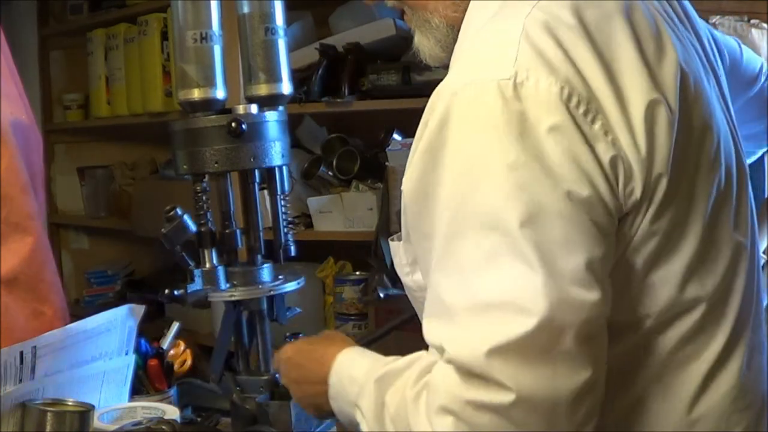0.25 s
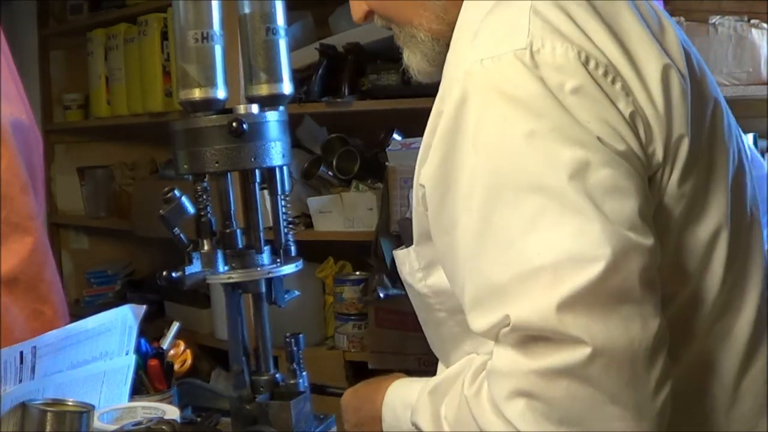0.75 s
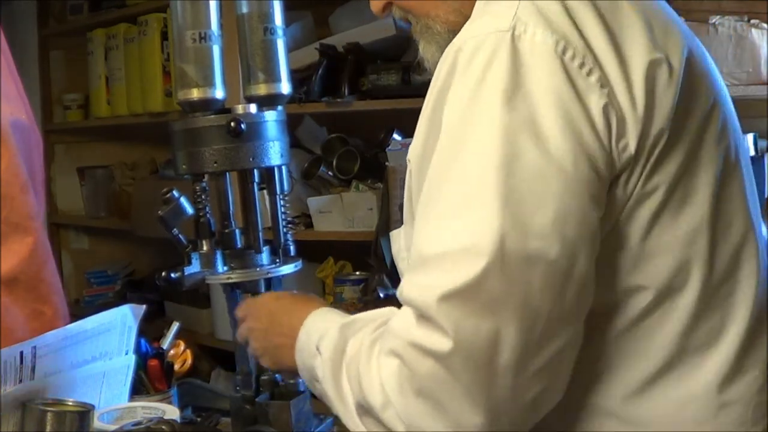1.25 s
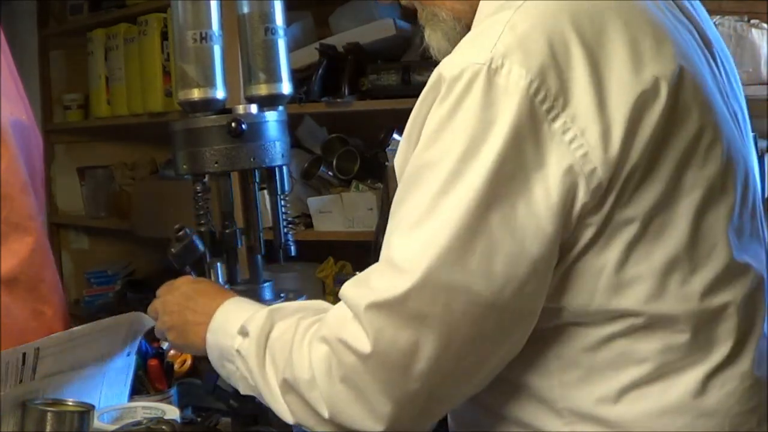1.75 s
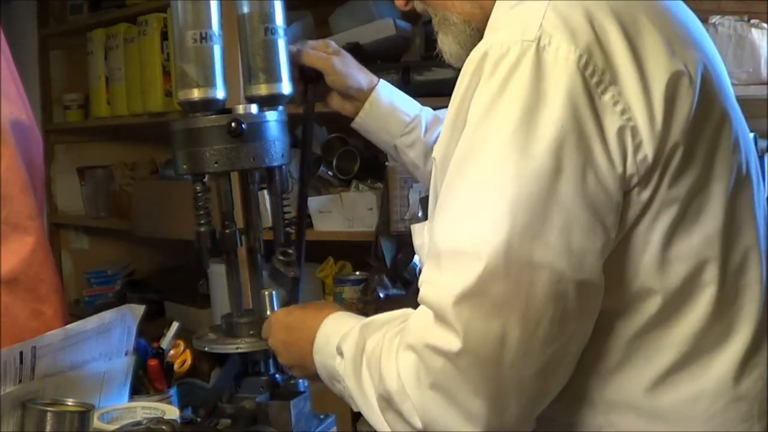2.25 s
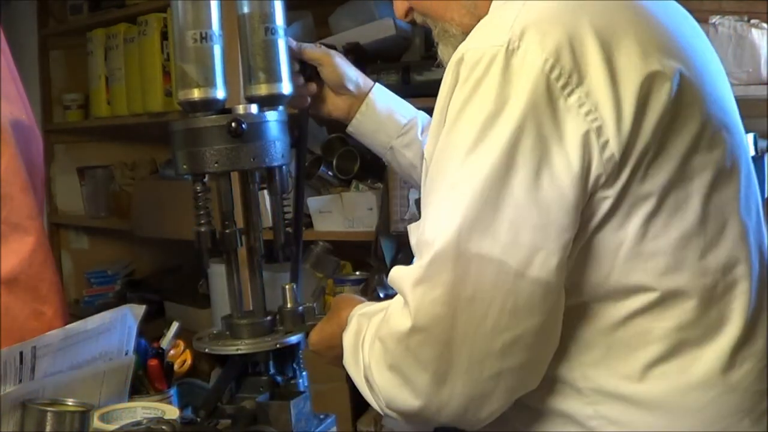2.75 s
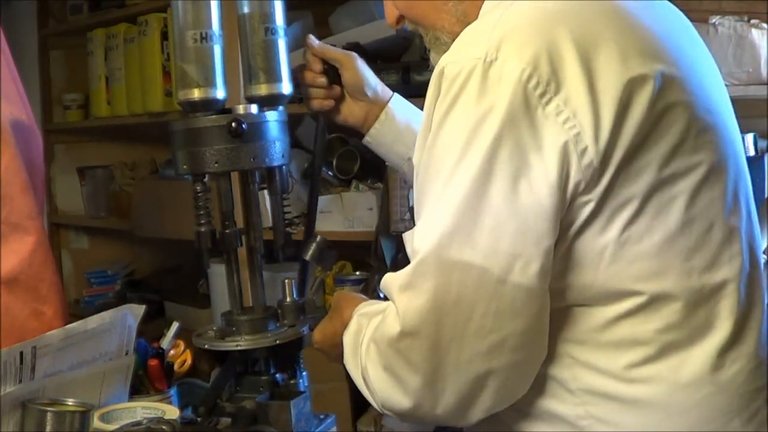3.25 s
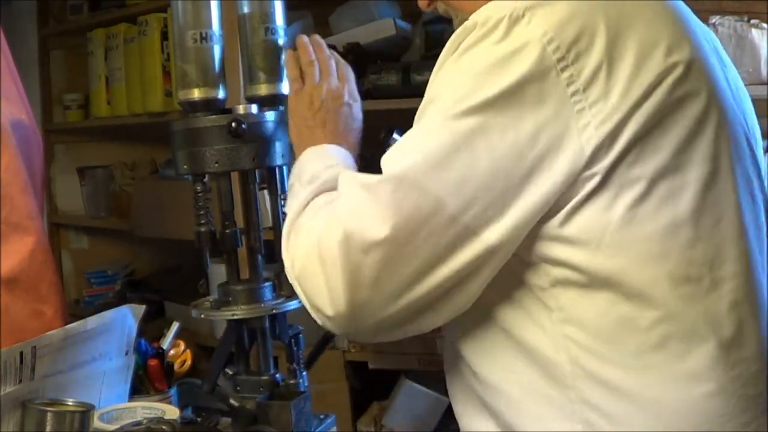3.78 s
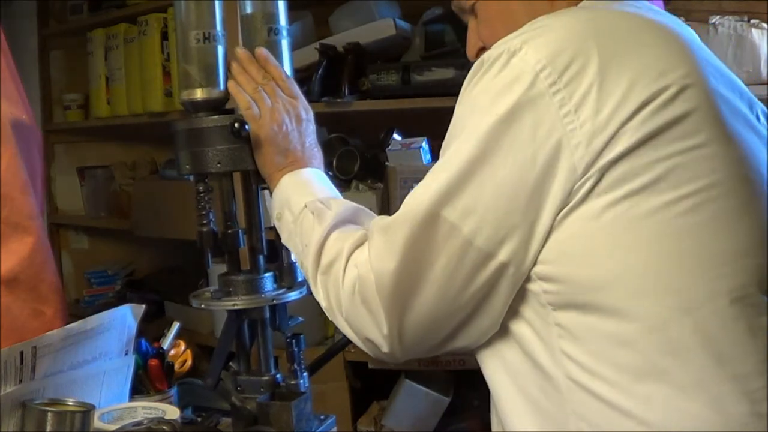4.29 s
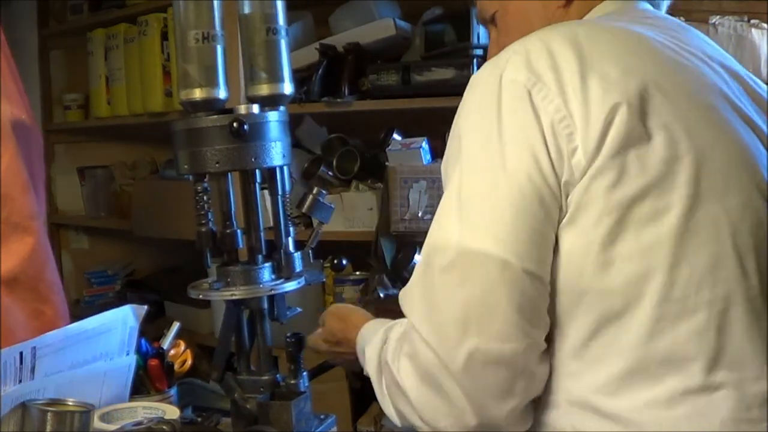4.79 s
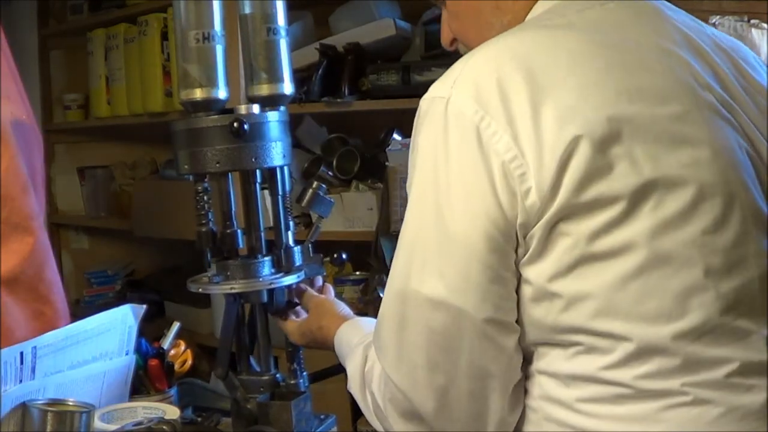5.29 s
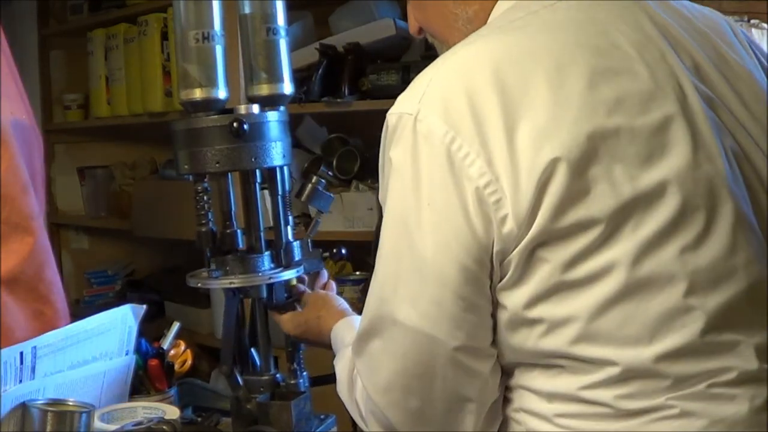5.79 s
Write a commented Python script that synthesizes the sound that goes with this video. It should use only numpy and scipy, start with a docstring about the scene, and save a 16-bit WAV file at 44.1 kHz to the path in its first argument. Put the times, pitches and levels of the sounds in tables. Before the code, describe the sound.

Hand-worked metal press in a small workshop: two piercing high squeals, then clusters of clacks, knocks and sharp clicks, short squeaks, scrapes and sleeve rustle.

```python
"""Shotshell reloading press on a wooden bench.

A hand-worked press in a small, cluttered workshop: dry pivots squeal near 10 kHz as wobbling sines.
Ram, shell plate and linkage clack as noise cracks with ringing modes; a coil spring sings in mode clusters.
Shaped noise gives steel scrapes, sleeve rustle, a low bump and the quiet room; a sine gives a thin whine."""
import sys
import numpy as np
from scipy import signal
from scipy.fft import rfft, irfft, next_fast_len
from scipy.io import wavfile
from scipy.ndimage import uniform_filter1d, minimum_filter1d

SR = 44100
rng = np.random.default_rng(int(sys.argv[2]) if len(sys.argv) > 2 else 0)


def dump(signal):
    """Clip the signal to [-1, 1] and save it as 16-bit WAV at the path in sys.argv[1]."""
    limited = np.clip(np.atleast_2d(signal).T, -1, 1)
    pcm = np.round(limited * 32767).astype(np.int16)
    wavfile.write(sys.argv[1], SR, pcm)


N = 265923
TIME = np.arange(N) / SR
RING_TIME = TIME[:SR // 4]
TOP_HZ = 15900


def undb(db):
    """Decibels to gain."""
    return 10 ** (np.asarray(db) / 20)


def curve(rows, column=1):
    """One column of a table, joined by straight lines in time."""
    rows = np.array(rows)
    return np.interp(TIME, rows[:, 0], rows[:, column])


def unit(x):
    """Scale to an energy of one."""
    return x / np.sqrt(np.sum(x ** 2))


def fade(t, t60_s):
    """Exponential decay, 60 dB in t60_s."""
    return np.exp(-np.log(1000) * t / t60_s)


def envelope(start_s, hold_s, attack_s, release_s):
    """Rise by 60 dB up to the start, hold, and fall by 60 dB per release time."""
    before = (start_s - TIME) / attack_s
    after = (TIME - start_s - hold_s) / release_s
    return fade(np.clip(np.maximum(before, after), 0, 2), 1)


def swells(rows, attack_s, release_s):
    """Sum of the envelopes of (start s, hold s, level dB) rows."""
    return sum(undb(db) * envelope(start, hold, attack_s, release_s) for start, hold, db in rows)


def band(x, low_hz, high_hz):
    """Causal band-pass."""
    sos = signal.butter(3, [low_hz, min(high_hz, .45 * SR)], "band", fs=SR, output="sos")
    return signal.sosfilt(sos, x)


def walk(rate_hz):
    """Smooth random signal with a spread near one."""
    step = max(int(SR / rate_hz), 1)
    held = np.repeat(rng.standard_normal(N // step + 1), step)
    return np.sqrt(1.5) * uniform_filter1d(held, step)[:N]


def shape(x, points):
    """Filter x by a response of (Hz, dB) points, joined over log frequency."""
    hz, db = np.transpose(points)
    size = next_fast_len(N)
    bins_hz = np.maximum(np.arange(size // 2 + 1) * SR / size, 1)
    gain = undb(np.interp(np.log(bins_hz), np.log(hz), db))
    return irfft(rfft(x, size) * gain, size)[:N]


def colour(x, points):
    """Give x a spectrum, at rms one."""
    y = shape(x, points)
    return y / y.std()


def stereo(mid, side):
    """Left and right from mid and side."""
    return np.array([mid + side, mid - side])


def add(track, start_s, sound):
    """Mix a sound into the track."""
    i = max(int(start_s * SR), 0)
    track[i:i + len(sound)] += sound[:N - i]


# Room noise spectrum. Each row: frequency in Hz, relative level in dB.
ROOM_COLOUR = [(10, -50), (30, -18), (70, -7.5), (170, -3.5), (260, -3), (420, -0.5), (700, -5),
               (2000, -7.5), (3500, -7.5), (15000, -10.5)]
# Room noise width. Each row: frequency in Hz, side minus mid in dB.
ROOM_WIDTH = [(60, -16.5), (110, -14.5), (200, -3.5), (380, 0), (700, 6.5), (1290, 7.5), (2380, 3.5),
              (4400, -1.5), (8120, -1.5), (15000, -45)]
ROOM_DB = -48.5
WHINE_HZ, WHINE_DB = 15734, -54.5


def background():
    """Steady room noise, widest in the middle of the range, and a thin electrical whine."""
    mid, side = (colour(rng.standard_normal(N), ROOM_COLOUR) for _ in range(2))
    air = stereo(mid, shape(side, ROOM_WIDTH)) * undb(ROOM_DB)
    whine = np.sqrt(2) * np.sin(2 * np.pi * WHINE_HZ * TIME)
    return air + undb(WHINE_DB) * whine


# Cloth brushing as the arm moves. Each row: time in seconds, level in dB.
ARM_MOTION = [(0, -53), (.26, -41.5), (.5, -47.5), (.88, -53), (1.3, -46.5), (2.65, -46.5), (3.05, -50),
              (3.2, -55), (3.4, -54.5), (3.52, -47.5), (3.75, -39), (4.05, -45.5), (4.3, -43), (4.48, -48),
              (4.68, -36.5), (5.1, -44.5), (5.5, -50.5), (6.03, -51.5)]
# Quick bright swishes. Each row: start in seconds, hold in seconds, level in dB.
QUICK_SWISHES = [(.16, .06, -42.5), (1.683, .04, -43), (1.912, 0.031, -37), (4.007, 0.011, -45),
                 (6.008, 0.023, -37.5)]
# Low rub of the folds. Each row: frequency in Hz, relative level in dB.
RUB_COLOUR = [(20, -43.5), (110, -13), (200, -6), (450, -1), (1000, -2), (2000, -1), (4000, -8),
              (16000, -22.5)]
# Bright swish of the fibres. Each row: frequency in Hz, relative level in dB.
SWISH_COLOUR = [(20, -31.5), (1500, -27), (4000, -6.5), (7500, 1), (10500, -1.5), (16000, -12)]
RUB_DB, RUB_DB_PER_ARM_DB = -13.5, .75  # the low rub grows more slowly than the bright swish


def sleeve(flicker_db=0.24, grain_db=1.5, attack_s=0.17, release_s=0.11):
    """Cotton folds rub and their fibres swish as the arm moves."""
    texture_db = grain_db * walk(2000) + flicker_db * walk(37)
    folds, fibres = rng.standard_normal((2, N)) * undb(texture_db)
    arm_db = curve(ARM_MOTION)
    quick = swells(QUICK_SWISHES, attack_s, release_s)
    rub = colour(folds, RUB_COLOUR) * undb(RUB_DB + RUB_DB_PER_ARM_DB * arm_db)
    swish = colour(fibres, SWISH_COLOUR) * np.hypot(undb(arm_db), quick)
    return rub + swish


# Soft, low bump through the bench. Each row: start in seconds, hold in seconds, level in dB.
BUMPS = [(4.985, .06, -52)]


def bump(centre_hz=173, width_hz=100, attack_s=0.1, release_s=0.26):
    """The bench top booms faintly: swelling low band noise."""
    boom = band(rng.standard_normal(N), centre_hz - width_hz / 2, centre_hz + width_hz / 2)
    return boom / boom.std() * swells(BUMPS, attack_s, release_s)


# Parts sliding over each other. Each row: start in seconds, hold in seconds, level in dB.
SCRAPES = [(1.462, 0.017, -43), (1.658, 0.013, -38.5), (1.94, .01, -46), (4.524, 0.11, -33),
           (4.674, 0.037, -28), (4.8, .005, -47), (4.954, 0.043, -48)]
# Scrape spectrum. Each row: frequency in Hz, relative level in dB.
SCRAPE_COLOUR = [(15, -43), (60, -11.5), (200, -10), (400, -2.5), (950, -2.5), (1800, -5), (4000, -17.5),
                 (9000, -5.5), (16000, -30)]


def scrape(catch_db=4.0, grain_db=4, attack_s=0.18, release_s=.24):
    """Sliding steel catches and slips in dense, uneven grains."""
    texture_db = grain_db * walk(1500) + catch_db * walk(110)
    grains = rng.standard_normal(N) * undb(texture_db)
    return colour(grains, SCRAPE_COLOUR) * swells(SCRAPES, attack_s, release_s)


# Return spring modes. Each row: frequency in Hz, relative level in dB.
SPRING_MODES = [(3800, -3), (5443, -6), (5792, 0), (6100, -1), (8560, 1), (8823, -7), (12650, -15)]
# Jolts to the return spring. Each row: start in seconds, level in dB.
SPRING_JOLTS = [(1.815, -46.5), (2.063, -49), (2.315, -46)]


def spring(t60_s=2.2, spread=0.016, count=6):
    """The coil sings in clusters of close, lightly damped modes."""
    out, t = np.zeros(N), TIME[:SR]
    for start, level_db in SPRING_JOLTS:
        ring = np.zeros(len(t))
        for hz, db in SPRING_MODES:
            cluster_hz = hz * (1 + spread * rng.standard_normal((count, 1)))
            ring += undb(db) * np.sin(2 * np.pi * cluster_hz * t).sum(axis=0)
        add(out, start, undb(level_db) * ring / ring.std() * fade(t, t60_s))
    return out


def note(hz, free_db, width=0.077, t60_s=0.08):
    """The struck part's own ring: the more freely it hangs, the stronger and narrower."""
    half = min(width * undb(-free_db / 2), .5)
    burst = rng.standard_normal(len(RING_TIME)) * fade(RING_TIME, t60_s)
    return undb(free_db) * unit(band(burst, hz * (1 - half), hz * (1 + half)))


# Ram and lever land on their stops and shake the bench. Each row: start in seconds, base level in dB,
# hardness in dB per octave, note of the struck part in Hz, how freely it rings in dB.
KNOCKS = [(.947, -30.5, -0.6, 410, -8), (1.1048, -36.5, 2.3, 1620, -2), (1.198, -48.5, -3.8, 830, -3),
          (1.452, -28, -1.2, 389, -5), (1.459, -32, -2, 834, -4), (1.583, -32, 0, 3000, -20),
          (1.604, -38, -2.5, 1520, 1), (1.674, -39, .8, 413, -9), (1.86, -48, -1.5, 484, -3),
          (1.95, -44.5, -2, 585, -6), (1.995, -51, -1, 404, 0), (2.0705, -37.5, 0.1, 5960, -13),
          (2.323, -43, 2, 1200, -12), (2.594, -36, 2.5, 435, -4), (3.83, -42, -1, 408, 8),
          (3.879, -40.5, -1.5, 380, 2.5), (3.886, -34.5, 1.5, 1630, 5.5), (4.395, -54, -4.5, 560, 1),
          (4.433, -40, 1.5, 480, -6), (4.537, -45.5, -5.5, 794, 7), (4.571, -37.5, -2.5, 1270, 4),
          (4.591, -35.5, 3.5, 1490, -12), (4.797, -34.5, 0.6, 584, 6.5)]
# The linkage takes up its play. Each row: start in seconds, base level in dB,
# hardness in dB per octave, note of the struck part in Hz, how freely it rings in dB.
CLACKS = [(.344, -37, -2, 1800, 4), (.3492, -31.5, -0.4, 4520, 1.5), (.503, -52.5, -6, 1370, -3),
          (.917, -41, -0.8, 1670, -1), (.952, -35.5, 2.5, 1670, -3), (1.017, -47, -4, 1530, 3),
          (1.098, -32.5, -1, 1720, 3.5), (1.184, -41.5, -5.5, 834, 3), (1.421, -47.5, -4, 1820, 0),
          (1.446, -31, 7, 1750, -6), (1.492, -30.5, 1.5, 1800, 2), (1.594, -25, -4, 988, -2),
          (3.8146, -26.5, -1, 1585, 5.5), (3.821, -32.5, -2, 1590, 4), (3.8753, -27.5, 1.5, 5340, -5),
          (4.073, -51, -5, 2020, 4), (4.431, -36, -2.5, 4550, 0), (4.631, -29, -2, 960, -6),
          (4.686, -29.5, -0.5, 937, 1), (4.757, -41, 5, 2310, 15), (4.775, -31.5, -0.8, 2720, 5),
          (4.783, -37, -1.5, 1980, 2), (4.795, -35.5, -2, 1925, -9), (4.951, -44, -1, 1240, -2)]
# The shell plate's catch and other small steel parts snap home. Each row: start in seconds,
# base level in dB, hardness in dB per octave, note of the struck part in Hz, how freely it rings in dB.
CLICKS = [(1.543, -42, -1, 9350, 4), (1.662, -38.5, -0.5, 12000, 4), (1.9052, -27, -0.3, 1180, 3),
          (1.943, -30.5, -1, 10700, 6), (2.052, -29.5, 0, 6750, 5), (2.063, -23.5, -1.5, 6214, -0.5),
          (2.304, -32, -1, 9150, -1), (2.311, -27, 0, 1140, -16), (2.316, -23, -0.6, 1206, 20),
          (2.368, -36, .8, 4880, 10), (2.5779, -31, 1.5, 12600, -1), (2.6743, -45, -1, 6040, 0),
          (3.1231, -35, 1.5, 6247, -2), (3.377, -49.5, -2.5, 6000, 0), (4.662, -23, -3.8, 13700, -2),
          (4.731, -34.5, -0.7, 12900, -10)]
# Share of each blow's force, in dB: thud, clack, clank, tick.
KNOCK_SHARE_DB = (-2.5, 0.5, -2.5, -2)
CLACK_SHARE_DB = (-13, -2, -0.5, -13.5)
CLICK_SHARE_DB = (-23, -18.5, -4, 0)
NOTE_LIFT_DB = 4.5  # the register that holds the note stands out
HARDNESS_PIVOT_HZ = 2220


def strikes():
    """Every blow as (s, dB of each register, note Hz, ring dB); harder contact favours the treble."""
    low_hz, high_hz = np.transpose(REGISTERS)[:2]
    octaves = np.log2(np.sqrt(low_hz * high_hz) / HARDNESS_PIVOT_HZ)
    kinds = (KNOCKS, KNOCK_SHARE_DB), (CLACKS, CLACK_SHARE_DB), (CLICKS, CLICK_SHARE_DB)
    for rows, share_db in kinds:
        for start, db, hardness, note_hz, free_db in rows:
            lift_db = NOTE_LIFT_DB * ((low_hz <= note_hz) & (note_hz < high_hz))
            yield start, db + np.array(share_db) + hardness * octaves + lift_db, note_hz, free_db


# Registers thud, clack, clank and tick. Each row: low edge in Hz, high edge in Hz, t60 in seconds,
# build-up in seconds, base crack level in dB, level of the modes in dB.
REGISTERS = [(232, 796, 0.14, 0.0022, -30, 1.5), (805, 2310, 0.12, 0.00071, -15.5, 0),
             (1913, 6550, 0.11, 0.0014, -7.5, -6), (6270, 15300, 0.077, 0.00037, -5.5, -3)]
# Modes of the press on its bench. Each row: frequency in Hz, relative level in dB, t60 in seconds.
PRESS_MODES = [(241, -28, 0.33), (387, -7.5, 0.15), (432, 4, 0.046), (535.4, -1.5, .14), (770, -19, 0.26),
               (960, 7, 0.049), (1181, 1.5, 0.11), (1465, 4.5, 0.077), (1555, 4.5, 0.12),
               (1692, 3.5, 0.042), (1877, -4, 0.13), (1970, -7.5, 0.052), (2540, -20, 0.116),
               (3350, 1, 0.087), (3600, -1, 0.1), (3730, 7.5, 0.057), (4630, 8.5, 0.064), (5000, -8, 0.053),
               (5640, 6, 0.073), (6100, -12.5, 0.12), (7580, 2.5, 0.12), (8550, -21, 0.064),
               (9240, 5, 0.17), (9600, 13, 0.03), (10740, 1, 0.064), (13300, -21, .11)]
SNAP_DB = 2.5  # light, hard parts crack more sharply than heavy ones


def blows(crack_s=0.0013, detune=0.0069, rattle=0.32, bounce_s=.0046, bounce_db=-8, dulling_db=50):
    """Each blow: a short crack, a dense rattling ring, the struck part's note and the press modes."""
    out = np.zeros(N)
    hz, db, t60 = np.transpose(PRESS_MODES)
    decays = undb(db)[:, None] * fade(RING_TIME, t60[:, None])
    length, lag = len(RING_TIME), int(bounce_s * SR)
    for start, levels_db, note_hz, free_db in strikes():
        _, clack_db, _, tick_db = levels_db
        # heavy parts stay in contact longer and sound duller
        top_hz = TOP_HZ * np.exp(-np.clip(clack_db - tick_db, 0, 20) / dulling_db)
        snap_db = SNAP_DB * np.clip((tick_db - clack_db) / 10, 0, 1)
        spot, shift, phase = rng.standard_normal((3, len(hz), 1))  # another spot favours other modes
        mode_hz = hz[:, None] * (1 + detune * shift)
        modes = (1 + spot / 2) * decays * np.sin(2 * np.pi * (mode_hz * RING_TIME + phase))
        part = note(note_hz, free_db)
        for level_db, (low, high, t60_s, build_s, crack_db, modes_db) in zip(levels_db, REGISTERS):
            high = min(high, max(top_hz, low * np.sqrt(2)))
            noise, contact, play = rng.standard_normal((3, length))
            swell = 1 - np.exp(-RING_TIME / build_s)
            loose = np.exp(rattle * np.repeat(play, SR // 1000)[:length])  # loose joints chatter
            dense = unit(band(noise * loose * swell * fade(RING_TIME, t60_s), low, high))
            tones = unit(modes[(hz >= low) & (hz < high)].sum(axis=0) * swell)
            ring = unit(dense + undb(modes_db) * tones) + part * (low <= note_hz < high)
            crack = unit(band(contact * np.exp(-RING_TIME / crack_s), low, high))
            crack = crack + undb(bounce_db) * np.pad(crack, (lag, 0))[:length]  # echo off the bench top
            blow = unit(unit(ring) + undb(crack_db + snap_db) * crack)
            # the level is the rms that this energy would have over 20 ms
            add(out, start, undb(level_db) * np.sqrt(SR / 50) * blow)
    return out


# A smooth, then a fully rough grip. Each row: pitch wobble in Hz, strength flutter in dB, slips per second.
GRIP = [(6, .5, 150), (300, 3, 1600)]


def friction(hz, roughness):
    """Dry friction locks onto one high mode; a rough grip makes it wobble and flutter."""
    smooth, rough = np.array(GRIP)
    wobble_hz, flutter_db, slips_per_s = smooth + np.clip(roughness, 0, 1) * (rough - smooth)
    turns = np.cumsum(hz + wobble_hz * walk(slips_per_s)) / SR
    return np.sqrt(2) * np.sin(2 * np.pi * turns) * undb(flutter_db * walk(slips_per_s))


# Two long squeals of the loaded pivot, a list of rows each.
# Each row: time in seconds, pitch in Hz, level in dB.
SQUEALS = [
    [(.281, 11100, -45), (.286, 10830, -12), (.299, 10730, -6), (.32, 10420, -6.5), (.335, 10240, -5.5),
     (.348, 10255, -4), (.358, 10310, -14), (.395, 10260, -33), (.425, 10300, -55)],
    [(.595, 10330, -50), (.615, 10450, -41), (.628, 10650, -6), (.648, 10750, -3), (.67, 10680, -4.5),
     (.687, 10510, -11.5), (.699, 10435, -9), (.713, 10400, -26), (.765, 10430, -57)],
]
# Roughness of each long squeal, 0 to 1.
SQUEAL_ROUGHNESS = [.15, .02]
# Short squeaks of lightly loaded pivots. Each row: start in seconds, hold in seconds, pitch in Hz,
# mean level in dB, roughness 0 to 1.
SQUEAKS = [(0.015, 0.018, 9050, -25.5, 0), (0.047, 0.012, 8940, -34.5, 0), (0.38, .003, 9200, -21.5, .9),
           (0.397, .011, 8830, -30, .6), (3.682, 0.0037, 9020, -19, 0), (3.712, 0.034, 8980, -26.5, 0.07),
           (3.748, 0.061, 8950, -21, 0.07), (3.829, 0.036, 8993, -11.5, 0.02),
           (4.537, .013, 10925, -15, 0.05), (4.617, .004, 9200, -22.5, .35)]
SQUEAK_ATTACK_S, SQUEAK_RELEASE_S = 0.034, 0.06
SQUEAK_SWELL_DB, SQUEAK_SWELLS_PER_S = 1.5, 80  # the hand's pressure is never quite even


def squeals():
    """Long squeals follow the load on the pivot; short squeaks swell and die around one pitch."""
    out = np.zeros(N)
    for rows, roughness in zip(SQUEALS, SQUEAL_ROUGHNESS):
        gripping = (TIME >= rows[0][0]) & (TIME <= rows[-1][0])
        out += gripping * undb(curve(rows, column=2)) * friction(curve(rows), roughness)
    swell_db = SQUEAK_SWELL_DB * walk(SQUEAK_SWELLS_PER_S)
    for start, hold_s, hz, db, roughness in SQUEAKS:
        pressure = undb(db + swell_db) * envelope(start, hold_s, SQUEAK_ATTACK_S, SQUEAK_RELEASE_S)
        out += pressure * friction(hz, roughness)
    return out


def workshop(x, wet_db, side_db, left_db, t60_s=0.09, first_s=.005, wide_low_hz=550, wide_high_hz=9500):
    """Crowded shelves scatter a short tail; left and right differ mostly in the middle of the range."""
    tails = rng.standard_normal((2, len(RING_TIME))) * fade(RING_TIME, t60_s) * (RING_TIME > first_s)
    mid, side = (signal.fftconvolve(x, unit(tail))[:N] for tail in tails)
    sos = signal.butter(1, [wide_low_hz, wide_high_hz], "band", fs=SR, output="sos")
    side = signal.sosfilt(sos, side)
    balance = undb(np.array([[left_db], [-left_db]]) / 2)
    return stereo(x + undb(wet_db) * mid, undb(side_db) * side) * balance


def scene():
    """The press stands close, almost straight ahead."""
    parts = sleeve() + bump() + scrape() + spring() + blows()
    press = workshop(parts, wet_db=-15.0, side_db=-11, left_db=.5)
    pivots = workshop(squeals(), wet_db=-19, side_db=-17, left_db=1.3)
    return background() + press + pivots


def record(dry, ceiling=.93, size=129):
    """A limiter holds the loudest peaks down, and the recorder cuts the top."""
    headroom = np.minimum(1, ceiling / (np.abs(dry).max(axis=0) + 1e-9))
    gain = uniform_filter1d(minimum_filter1d(headroom, size), size)
    low_pass = signal.ellip(10, .2, 70, TOP_HZ, fs=SR, output="sos")
    return signal.sosfilt(low_pass, dry * gain)


dry = scene()
out = record(dry)
dump(out)
```